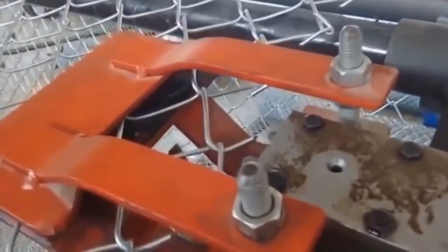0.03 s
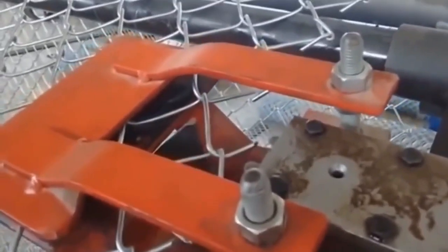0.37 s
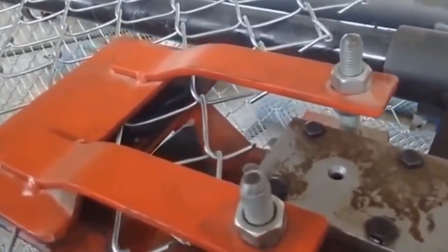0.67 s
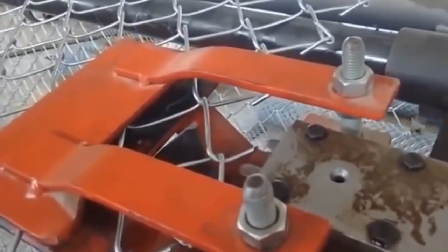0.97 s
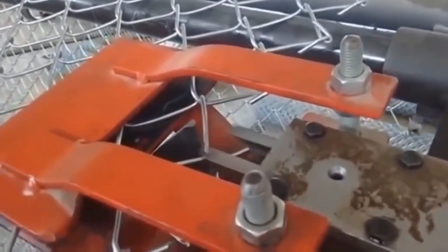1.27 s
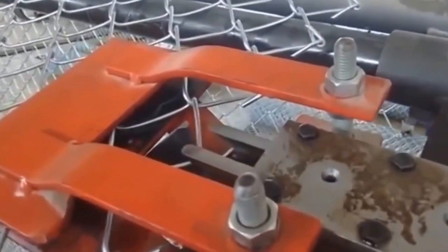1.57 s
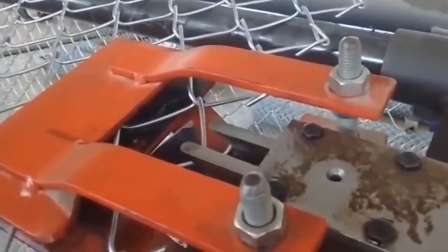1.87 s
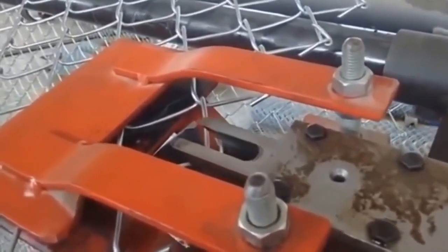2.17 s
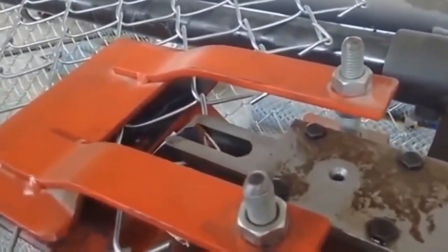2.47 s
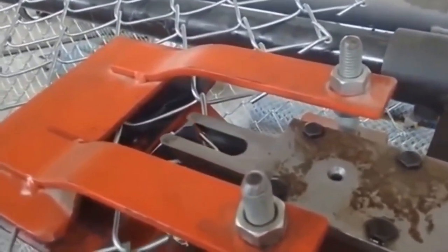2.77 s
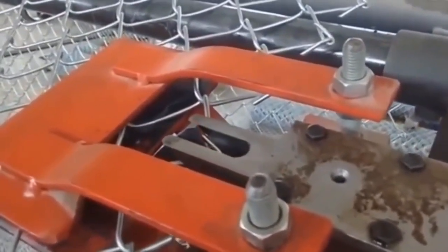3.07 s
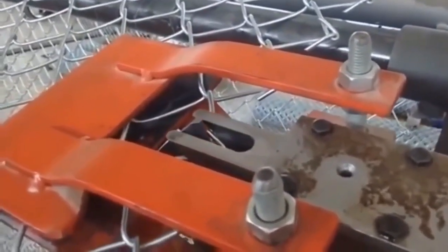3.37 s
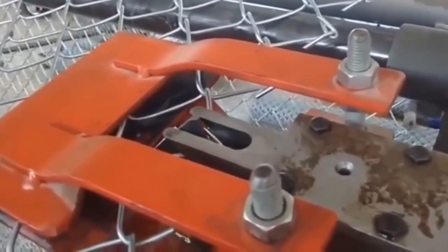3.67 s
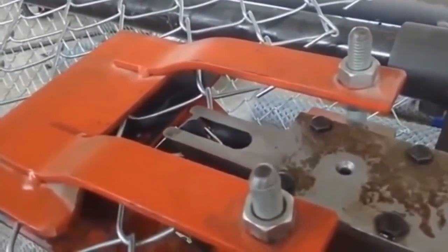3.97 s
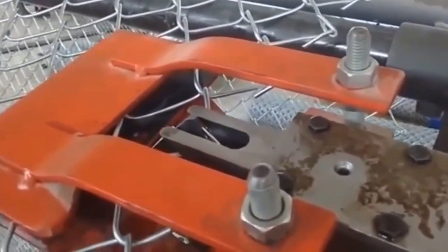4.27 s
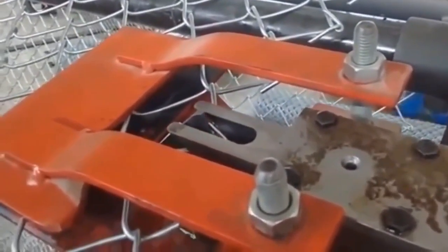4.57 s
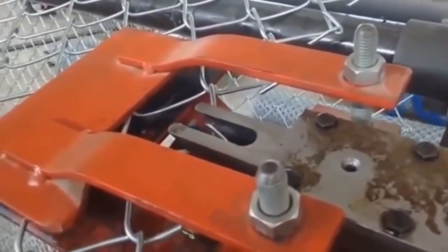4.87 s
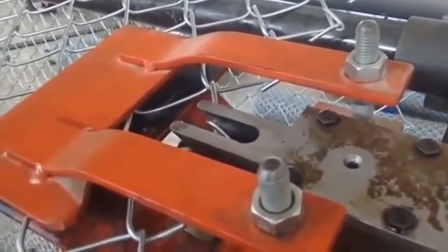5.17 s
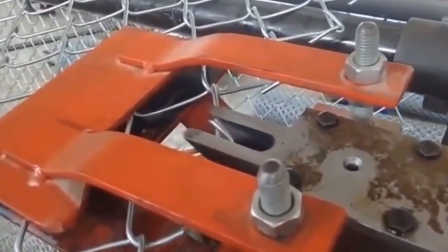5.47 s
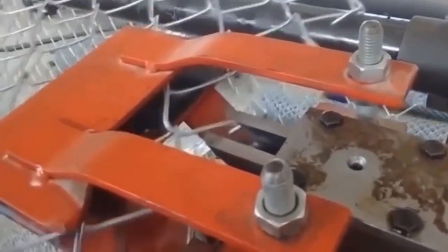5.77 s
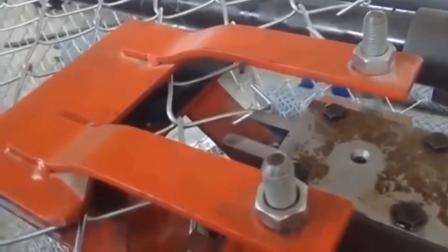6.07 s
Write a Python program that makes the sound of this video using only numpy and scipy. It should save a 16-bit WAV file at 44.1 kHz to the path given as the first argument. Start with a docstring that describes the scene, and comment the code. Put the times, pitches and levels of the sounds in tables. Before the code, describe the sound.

A chain-link fence machine is heard close up over the quiet, steady hum of a factory hall. It starts with a shiver of mesh, a few jolts and short rough groans in the first second. A wire spiral then slaps in a steel trough about eleven times a second, bright and jangling, over scraping wire and whirring gears. From 1 to 2 seconds a faint motor whine rises slightly. Between 2.5 and 3.8 seconds the clatter gets louder, with hard clacks and low thumps, then eases. At about 4.4 seconds the cutter shears the wire in a loud cluster of clacks and thuds; the wire ends ring and the mesh dies away in a metallic hiss. A faint thin whistle holds through the lull from 5 seconds. A latch ticks twice around 5.5 seconds, and at 5.7 the drive restarts with rattles, groans and a clack near 6.1 seconds.

```python
"""A wire spiral slaps in the steel trough of a chain-link fence machine, close up, eleven times a second,
thrown by the spinning blade that winds it. Each slap is a burst of tiny collisions that ring wire and
trough and thump the frame. Underneath, wire scrapes, gears whir, the frame groans and a servo whines as
it moves the guide fork. The cutter shears the wire, the mesh shivers out, a latch ticks twice and the
drive starts again, all over the hum of the hall."""
import sys
import numpy as np
from scipy import signal
from scipy.fft import rfft, irfft, next_fast_len
from scipy.io import wavfile

SR = 44100
rng = np.random.default_rng(int(sys.argv[2]) if len(sys.argv) > 2 else 0)


def to_wav(s):
    """Save 16-bit WAV."""
    ch = np.atleast_2d(s).T  # columns
    pcm = np.round(np.clip(ch, -1, 1) * 32767)  # PCM
    wavfile.write(sys.argv[1], SR, pcm.astype(np.int16))


N = 270328

# The blade throws one slap a turn. Each row: start in seconds, contact length in seconds,
# then the relative levels in dB of wire jangle, trough clatter and frame thump.
SLAPS = [(0.353, 0.011, -28.5, -43, -52), (0.382, 0.0083, -32, -30.5, -52),
         (0.453, 0.0059, -25.5, -25, -46), (0.579, .004, -23.5, -36, -49), (0.639, 0.0074, -25.5, -34, -50),
         (0.748, .005, -33.5, -28, -47), (0.826, 0.01, -27.5, -38, -55), (0.925, .008, -24.5, -47, -60),
         (1.008, 0.017, -30, -32.5, -54), (1.092, 0.011, -22.5, -38, -62), (1.191, 0.01, -31.5, -36, -62),
         (1.277, 0.025, -27, -43, -63), (1.371, 0.01, -26.5, -37, -59), (1.45, 0.011, -22, -38, -66),
         (1.541, 0.022, -23.5, -59, -57), (1.637, 0.019, -26, -38, -49), (1.736, .008, -30.5, -38, -59),
         (1.824, 0.024, -31.5, -37.5, -64), (1.906, 0.011, -28, -35, -58), (1.985, 0.026, -23.5, -36, -34),
         (2.088, 0.0074, -21, -32.5, -26), (2.175, 0.019, -25, -38, -63), (2.268, 0.028, -26.5, -38, -48),
         (2.346, 0.035, -34, -53, -62), (2.448, 0.036, -31, -54, -66), (2.53, 0.02, -20.5, -35, -23),
         (2.627, 0.028, -19.5, -27.5, -22.5), (2.715, 0.023, -20.5, -28, -23),
         (2.806, 0.017, -17, -20.5, -20.5), (2.895, 0.022, -20, -23.5, -21),
         (2.984, 0.029, -18.5, -22, -19.5), (3.083, 0.01, -20, -24, -15.5),
         (3.17, 0.013, -17.5, -20, -12.5), (3.261, 0.015, -18.5, -20.5, -22),
         (3.352, 0.015, -18.5, -23, -16), (3.445, 0.011, -18, -21, -16),
         (3.534, 0.018, -18.5, -22.5, -18.5), (3.627, .017, -19, -27.5, -24), (3.712, 0.026, -20, -26, -22),
         (3.804, 0.013, -19.5, -29, -23.5), (3.892, 0.015, -33, -46, -62), (3.98, 0.018, -21, -31, -32),
         (4.05, 0.029, -29, -48, -63), (4.17, 0.019, -21, -33.5, -33), (4.255, 0.018, -27, -51, -70),
         (4.341, 0.012, -24.5, -36.5, -58)]
# Jolts of the starting drive and blows of the cutter. Each row reads like a slap.
JOLTS = [(0.113, 0.037, -35.5, -39, -58), (0.152, 0.024, -27, -33.5, -63), (0.173, 0.0054, -26.5, -32, -57),
         (4.403, 0.028, -22.5, -34, -36), (4.431, 0.055, -18.5, -25.5, -16),
         (4.507, 0.029, -19.5, -30, -28), (4.579, 0.023, -25, -45, -36), (5.675, 0.0056, -38, -28.5, -46),
         (5.706, 0.042, -37, -33, -47), (5.741, 0.021, -30, -39, -45), (6.076, 0.013, -35, -37, -24),
         (6.086, 0.039, -24.5, -42, -28)]
def slaps():
    """Every slap or jolt lands as a bright snap, a wire jangle and a trough clatter."""
    start, length, wire_db, trough_db, _ = np.transpose(SLAPS + JOLTS)
    jangle = from_db(-1.16) * wire_jangle(start, length, wire_db)
    clatter = from_db(-2.27) * trough_clatter(start, length, trough_db)
    return snap(start, length, wire_db) + jangle + clatter


# The wire's bright crackle. Each row: frequency in Hz, relative level in dB.
WIRE_SPECTRUM = [(1500, -19), (2500, 0), (3100, -3.5), (3700, 0.5), (4200, -2.5), (4800, -3), (5400, -3.5),
                 (6300, 0), (7200, -3), (8400, -1.5), (9500, -4.5), (11000, -8), (12500, -9),
                 (15200, -16.5)]
# The wire's ringing partials. Each row: frequency in Hz, relative level in dB.
WIRE_MODES = [(3553, 4.5), (3892, 3), (3941, -3), (4170, 3), (4377, -0.5), (4470, -2.5), (4533, -12.5),
              (5088, 1), (5405, -1.5), (5556, 2), (5739, 3), (7146, 2), (7364, -4), (7718, -7), (8036, -4),
              (8253, -1), (8413, 3), (9033, -2), (9186, 2)]
def wire_jangle(start, length, db, lead_in_s=0.022, lead_in_db=-9.5):
    """A faint hiss swells just before each slap's burst of collisions, which sets the wire ringing."""
    lead_in = blows(start - lead_in_s, np.full_like(start, lead_in_s), db + lead_in_db,
                    rise=lead_in_s, t60=0.042)
    landing = blows(start, length, db, rise=0.00094, t60=0.18)
    force = np.hypot(lead_in, landing) * contacts(per_s=2400, spread_db=4.5)
    jangle = steel(feeding(force, t60=0.027), WIRE_SPECTRUM, WIRE_MODES, modes_t60=0.066, modes_db=-6.5)
    return ring_on(jangle, t60=0.97, wet_db=-14.5)


# The trough's midrange body. Each row: frequency in Hz, relative level in dB.
TROUGH_SPECTRUM = [(60, -20), (150, -8.5), (300, -2), (500, -2), (800, 0.5), (1200, 0), (1900, -5.5),
                   (2600, -22), (4000, -13)]
# The trough's ringing partials. Each row: frequency in Hz, relative level in dB.
TROUGH_MODES = [(797, -4), (1023, 3.5), (1335, -8.5), (1561, -5), (1830, 2), (1992, 2), (2132, 0),
                (2369, 2), (2455, 2), (2713, 4)]
def trough_clatter(start, length, db):
    """The steel trough rattles under the coils and rings with each hard clack."""
    rattling = blows(start, length, db, rise=0.0064, t60=0.1) * contacts(per_s=1800, spread_db=3.5)
    clacking, _ = clacks()
    force = rattling + clacking * contacts(per_s=6000, spread_db=3)
    clatter = steel(force, TROUGH_SPECTRUM, TROUGH_MODES, modes_t60=0.15, modes_db=-8.5)
    return ring_on(clatter, t60=0.79, wet_db=-15)


# The snap's sharp top end. Each row: frequency in Hz, relative level in dB.
SNAP_SPECTRUM = [(2500, -31), (3200, -11), (4200, 2), (6300, -11), (8400, 10.5), (10500, -26), (12500, -9),
                 (15000, 3.5)]
def snap(start, length, wire_db, snap_db=-9.5):
    """A dry, bright snap while steel touches steel."""
    touching = blows(start, length, wire_db + snap_db, rise=0.0011, t60=0.1)
    return colour(touching * contacts(per_s=1400, spread_db=6), SNAP_SPECTRUM)


# Single hard clacks, crowding as the cutter bites.
# Each row: start in seconds, then the relative levels in dB of trough clatter and frame thump.
CLACKS = [(0.579, -25, -46), (2.095, -24, -26), (2.831, -18, -18), (2.998, -17.5, -26), (3.452, -16.5, -26),
          (3.549, -17, -16.5), (3.724, -22.5, -24), (4.408, -27.5, -22), (4.433, -21, -25),
          (4.445, -17.5, -12), (4.459, -18.5, -19), (4.473, -20, -22), (4.48, -15.5, -19),
          (4.495, -20, -12), (4.515, -22, -16), (4.53, -28.5, -20), (4.59, -30, -22.5), (6.119, -25, -28)]
def clacks():
    """Steel strikes the trough hard: the force on the trough and the force on the frame."""
    start, trough_db, thump_db = np.transpose(CLACKS)
    length = np.full_like(start, 0.0023)
    return [blows(start, length, db, rise=0.001, t60=0.046) for db in (trough_db, thump_db)]


# The frame's low thud. Each row: frequency in Hz, relative level in dB.
THUMP_SPECTRUM = [(25, -24), (60, -7), (100, -2), (150, -1.5), (220, -0.5), (320, -7), (600, -12.5),
                  (1000, -20), (2000, -59)]
def thumps(opposite=0.92):
    """Hard blows shake the frame; the thud reaches the two microphone ports in nearly opposite phase."""
    start, length, _, _, db = np.transpose(SLAPS + JOLTS)
    _, clacking = clacks()
    force = np.hypot(blows(start, length, db, rise=0.013, t60=0.07), clacking)
    side, mid = from_db(-0.4) * colour(force * contacts(per_s=4000, spread_db=3), THUMP_SPECTRUM)
    return np.sqrt((1 + opposite) / 2) * np.array([-side, side]) + np.sqrt((1 - opposite) / 2) * mid


# Partials of the sheared wire ends. Each row: frequency in Hz, relative level in dB.
CUT_MODES = [(4229, -1), (4410, 0), (4460, 2), (4620, -9), (7638, -8), (7792, -7), (8786, -12), (8997, 3)]
def cut_ends():
    """The two wire ends spring apart at the cut and ring, beating and buzzing against the guides."""
    ringing = sum(from_db(db) * tone(hz, unsteady=1.8, flutter_hz=35) for hz, db in CUT_MODES)
    return blows(starts=[4.462], lengths=[0.095], levels_db=[-27.5], rise=0.017, t60=0.4) * rms_one(ringing)


# Shakes of the mesh. Each row: start in seconds, length in seconds, level in dB.
SHIVERS = [(0.063, 0.019, -32.5), (4.478, 0.095, -23), (4.95, 0.02, -48), (5.675, 0.059, -30)]
# The mesh's metallic hiss. Each row: frequency in Hz, relative level in dB.
MESH_SPECTRUM = [(300, -29), (700, -15), (1400, -2), (2400, 0.5), (3100, 9.5), (3700, 3), (4400, 3),
                 (5300, 0), (6300, -4.5), (7400, 0.5), (8500, -3.5), (10500, -6), (12500, -16),
                 (15000, -35)]
def mesh():
    """The many links of the shaken mesh shiver against each other and die away as an even hiss."""
    shivering = blows(*np.transpose(SHIVERS), rise=0.028, t60=1.58) * contacts(per_s=4500, spread_db=2)
    return colour(feeding(shivering, t60=0.019), MESH_SPECTRUM)


# How loud the sliding wire scrapes. Each row: time in seconds, level at full speed in dB.
SCRAPE_LEVEL = [(0, -42), (.25, -46), (.4, -40), (1.0, -36), (1.17, -40.5), (1.35, -36.5), (1.8, -39.5),
                (2.15, -33), (2.42, -39.5), (2.6, -31.5), (2.9, -29.5), (3.6, -29), (3.93, -34.5),
                (4.13, -37), (4.3, -33.5), (4.7, -36.5), (5.9, -50)]
def wire_scrape():
    """Wire scrapes along its guides and comes to rest after the cut."""
    speed = motion(stop_s=4.71, coast_db_per_s=35)
    rubbing = speed ** 2 * from_db(in_time(SCRAPE_LEVEL)[0]) * contacts(per_s=1800, spread_db=3)
    return steel(feeding(rubbing, t60=0.041), WIRE_SPECTRUM, WIRE_MODES, modes_t60=0.083, modes_db=-5.5)


# How hard the drive works. Each row: time in seconds, level at full speed in dB.
DRIVE_EFFORT = [(0, -36.5), (.27, -37), (.38, -32.5), (.56, -31.5), (.66, -35.5), (.92, -31), (1.16, -39.5),
                (1.4, -33.5), (1.57, -39.5), (2.4, -37.5), (3.0, -35), (3.5, -34), (4.1, -38.5),
                (5.7, -31.5), (5.85, -35), (6.1, -34)]
# The drive's whir. Each row: frequency in Hz, relative level in dB.
DRIVE_SPECTRUM = [(30, -44), (60, -28), (120, -17.5), (200, -7.5), (350, -7), (570, 3.5), (800, -3),
                  (1200, -3), (1800, -5), (2600, -8.5), (4000, -10), (8000, -22)]
def gears():
    """The gears whir and faintly rattle the trough until they are braked at the cut."""
    speed = motion(stop_s=4.465, coast_db_per_s=21)
    meshing = speed * from_db(in_time(DRIVE_EFFORT)[0]) * contacts(per_s=5000, spread_db=4)
    return steel(feeding(meshing, t60=0.05), DRIVE_SPECTRUM, TROUGH_MODES, modes_t60=0.1, modes_db=-9.5)


# Groans of the frame. Each row: start in seconds, length in seconds, pitch in Hz, level in dB.
GROANS = [(0.309, 0.051, 563, -30), (0.373, 0.032, 609, -39), (0.401, 0.013, 563.7, -35),
          (0.449, 0.026, 565, -29), (0.503, 0.047, 603.5, -30), (0.757, 0.028, 579.3, -40),
          (0.832, 0.025, 551, -32.5), (5.777, 0.051, 603.4, -34.5), (5.859, 0.056, 575, -36.5),
          (5.968, 0.034, 558, -41)]
# Other frame resonances that join in. Each row: frequency in Hz, level against the groan in dB.
FRAME_MODES = [(135, -16), (215, -15.5), (310, -12.5), (1029, -16)]
def frame_groans():
    """The loaded frame groans in short rough bursts, at a slightly different pitch each time."""
    start, length, hz, db = np.transpose(GROANS)
    pitch = np.interp(np.arange(N) / SR, start + length / 2, hz)
    resonances = sum(from_db(mode_db) * tone(mode_hz, unsteady=4.7, flutter_hz=44.5)
                     for mode_hz, mode_db in FRAME_MODES)
    groan = tone(pitch, unsteady=0.59, flutter_hz=45.5) + resonances
    return blows(start, length, db, rise=0.02, t60=0.28) * groan


# The servo's rising whine. Each row: time in seconds, pitch in Hz, level in dB.
SERVO_WHINE = [(.9, 735, -66), (1.03, 747, -42), (1.2, 800, -43), (1.44, 812, -35), (1.51, 824, -48),
               (1.75, 836, -38), (1.97, 871, -41.5), (2.06, 894, -68)]
def servo():
    """A fluttering whine over a rough lower octave that is strongest as the fork starts to move."""
    hz, db = in_time(SERVO_WHINE)
    whine = from_db(db) * tone(hz, unsteady=0.31, flutter_hz=32)
    load = blows(starts=[0.89], lengths=[0.42], levels_db=[-46], rise=0.042, t60=3.6)
    return whine + load * tone(hz / 2, unsteady=0.5)


def brake(hum_hz=216.4, whistle_hz=1646):
    """The drive hums as it brakes after the cut, then whistles thinly while it is held."""
    braking = blows(starts=[4.45], lengths=[0.42], levels_db=[-48], rise=0.039, t60=0.63)
    hum = tone(hum_hz, unsteady=0.15) + from_db(-3) * tone(2 * hum_hz, unsteady=0.15)
    holding = blows(starts=[4.92], lengths=[0.72], levels_db=[-51.5], rise=0.037, t60=0.42)
    return braking * hum + holding * tone(whistle_hz, unsteady=0.21)


# The latch's two ticks. Each row: start in seconds, length in seconds, click and knock levels in dB.
LATCH_TICKS = [(5.408, 0.002, -49, -37.5), (5.514, 0.0046, -32.5, -40)]
# The ping in the click. Each row: frequency in Hz, relative level in dB.
LATCH_MODES = [(1950, -6), (3900, 10), (8300, 5), (8870, 6)]
# The dull body of the knock. Each row: frequency in Hz, relative level in dB.
KNOCK_SPECTRUM = [(60, -11), (200, -1), (420, 3), (700, -7), (1200, -7), (2600, -13), (4000, -20)]
def latch():
    """The latch lets go: a dull knock, then a bright click with a brief ping."""
    start, length, click_db, knock_db = np.transpose(LATCH_TICKS)
    grit = rng.standard_normal((2, N))
    strike = blows(start, length, click_db, rise=0.0018, t60=0.017) * grit
    click = steel(strike, WIRE_SPECTRUM, LATCH_MODES, modes_t60=0.022, modes_db=1)
    knock = colour(blows(start, length, knock_db, rise=0.0012, t60=0.05) * grit, KNOCK_SPECTRUM)
    return ring_on(click, t60=0.54, wet_db=-7) + ring_on(knock, t60=0.8, wet_db=-4)


# Room tone. Each row: frequency in Hz, relative level in dB.
HALL_SPECTRUM = [(25, -24), (60, -28), (120, 4.5), (220, -3.5), (400, -4), (700, 5.5), (1500, -4),
                 (2500, 0.5), (4300, -4.5), (6300, -17.5), (8400, -4.5), (11000, -13.5), (15000, -16)]
def hall():
    """The hall hums: a quiet, steady bed of noise."""
    return from_db(-47) * colour(rng.standard_normal((2, N)), HALL_SPECTRUM)


# How alike the two ports sound. Each row: frequency in Hz, in-phase share, quadrature share.
PORT_LIKENESS = [(70, 0.42, -0.15), (172, 0.35, 0.6), (285, 0.73, -0.37), (670, 0.48, -0.41),
                 (1090, 0.69, -0.1), (1850, 0.93, -0.0015), (2174, 0.22, -0.29), (2590, -0.54, 0.64),
                 (2700, -0.76, -0.25), (3485, -2.1, 0.45), (3420, -0.77, -1.35), (3715, -0.35, 0.63),
                 (4230, 0.7, -0.29), (5000, 0.71, 0.6), (5590, -0.05, -0.89), (6330, -0.88, -0.33),
                 (7480, 0.2, -1.1), (8830, 0.45, 1), (9560, -0.23, -0.28), (11400, -0.2, -1.3),
                 (12300, 0.92, 0.16), (13200, -0.68, 0.15), (14600, -0.83, 0.57)]
# The right port faces the wire. Each row: frequency in Hz, level over the left in dB.
RIGHT_PORT_EQ = [(100, 1), (600, -2.5), (2000, 0.5), (4000, -0.5), (6500, 1), (8500, 3), (10500, 2.5),
                 (12500, -0.5)]
def microphone(paths):
    """Two sound paths become stereo at two ports that agree or oppose by frequency."""
    left, other = paths
    size = next_fast_len(N + 4096)
    bins = np.fft.rfftfreq(size, 1 / SR)
    hz, in_phase, quadrature = np.transpose(PORT_LIKENESS)
    alike = np.interp(bins, hz, in_phase + 1j * quadrature)
    alike = alike / np.maximum(np.abs(alike), 1)
    apart = np.sqrt(np.maximum(1 - np.abs(alike) ** 2, 0))
    right_gain = from_db(np.interp(bins, *np.transpose(RIGHT_PORT_EQ)))
    right = irfft(right_gain * (alike * rfft(left, size) + apart * rfft(other, size)), size)[:N]
    return np.array([left, right])


def motion(stop_s, coast_db_per_s, idle_s=5.52, idle_db=-10, restart_s=5.708, spin_up_db_per_s=380):
    """Speed of a driven part, 0 to 1: it runs, coasts down, idles once the latch lets go, then spins up."""
    t = np.arange(N) / SR
    speed_db = np.maximum(coast_db_per_s * (stop_s - t), spin_up_db_per_s * (t - restart_s))
    return np.maximum(from_db(np.minimum(speed_db, 0)), from_db(idle_db) * (t > idle_s))


def blows(starts, lengths, levels_db, rise, t60):
    """Force of a row of blows or pushes: each builds up, holds and dies. Times are in seconds."""
    power = np.zeros(N)
    for start, length, db in zip(starts, lengths, levels_db):
        at = np.arange(max(int(start * SR), 0), min(int((start + length + t60) * SR), N))
        age = np.maximum(at / SR - start, 0)
        attack = np.minimum(age / rise, 1)
        power[at] += (attack * from_db(db - 60 * np.maximum(age - length, 0) / t60)) ** 2
    return np.sqrt(power)


def contacts(per_s, spread_db):
    """Tiny random collisions of uneven size along two sound paths; rms 1."""
    born = rng.random((2, N)) < per_s / SR
    size, sign = rng.standard_normal((2, N))[:, :min(born.sum(), N)]
    clicks = np.zeros((2, N))
    np.place(clicks, born, np.sign(sign) * from_db(spread_db * np.clip(size, -2, 2)))
    return rms_one(clicks)


def steel(force, spectrum, modes, modes_t60, modes_db):
    """A steel part: a broad crackle with partials that sing above it."""
    age = np.arange(SR // 2) / SR
    partials = sum(from_db(db) * np.sin(2 * np.pi * (hz * age + rng.random((2, 1)))) for hz, db in modes)
    response = unit_energy(partials * from_db(-60 * age / modes_t60))
    ringing = signal.fftconvolve(force, response, axes=-1)[:, :N]
    return colour(force, spectrum) + from_db(modes_db) * ringing


def feeding(force, t60, hop=2048):
    """The wire keeps moving, so its fine pattern of resonances is new every few hundredths of a second."""
    age = np.arange(hop) / SR
    window = np.sqrt(signal.get_window("hann", 2 * hop))
    padded = np.pad(force, ((0, 0), (hop, 3 * hop)))
    out = np.zeros_like(padded)
    for i in range(0, N + hop, hop):
        response = unit_energy(rng.standard_normal((1, hop)) * from_db(-60 * age / t60))
        grain = padded[:, i:i + 2 * hop] * window
        out[:, i:i + 3 * hop - 1] += signal.fftconvolve(grain, response, axes=-1)
    return out[:, hop:hop + N]


def ring_on(x, t60, wet_db, lowest_hz=231):
    """Countless close modes of mesh, frame and hall keep a sound going, all but its bass."""
    age = np.arange(int(1.5 * SR)) / SR
    low_cut = signal.butter(4, lowest_hz, "high", fs=SR, output="sos")
    modes = signal.sosfilt(low_cut, rng.standard_normal((2, len(age))))
    response = from_db(wet_db) * unit_energy(modes * from_db(-60 * age / t60))
    return x + signal.fftconvolve(x, response, axes=-1)[:, :N]


def tone(hz, unsteady, flutter_hz=25):
    """A machine tone that flutters in level and phase; rms 1."""
    slow = signal.sosfilt(signal.butter(2, flutter_hz, fs=SR, output="sos"), rng.standard_normal((2, N)))
    along, across = unsteady * rms_one(slow)
    phase = 2 * np.pi * np.cumsum(hz * np.ones(N)) / SR
    return rms_one((1 + along) * np.sin(phase) + across * np.cos(phase))


def colour(x, spectrum):
    """EQ x to a spectrum, rolled off at both ends; white input keeps its power."""
    hz, db = np.transpose(spectrum)
    size = next_fast_len(x.shape[-1] + 4096)
    bins = np.maximum(np.fft.rfftfreq(size, 1 / SR), 1)
    gain = from_db(np.interp(np.log(bins), np.log(hz), db)) * bins / np.hypot(bins, 20)
    gain = gain / np.sqrt(1 + (bins / (2 * hz[-1])) ** 4)
    return irfft(rfft(x, size) * rms_one(gain), size)[..., :x.shape[-1]]


def in_time(rows):
    """Columns of a curve table at every sample."""
    times, *columns = np.transpose(rows)
    return [np.interp(np.arange(N) / SR, times, column) for column in columns]


def from_db(db):
    """Decibels to gain."""
    return 10 ** (np.asarray(db) / 20)


def rms_one(x):
    """Scale to unit rms."""
    return x / np.sqrt(np.mean(x ** 2) + 1e-20)


def unit_energy(x):
    """Scale each channel of a response to unit energy."""
    return x / np.sqrt(np.sum(x ** 2, axis=-1, keepdims=True))


def scene():
    """The machine over the hum of the hall; the tones of motors, frame and cut wire take one path only."""
    paths = slaps() + mesh() + wire_scrape() + gears() + latch() + hall()
    paths[0] += cut_ends() + frame_groans() + servo() + brake()
    return microphone(paths) + thumps()


def record(dry, cutoff_hz=15300):
    """A steep low-pass takes off the very top."""
    return signal.sosfilt(signal.ellip(12, 0.2, 90, cutoff_hz, fs=SR, output="sos"), dry)


dry = scene()
out = record(dry)
to_wav(out)
```